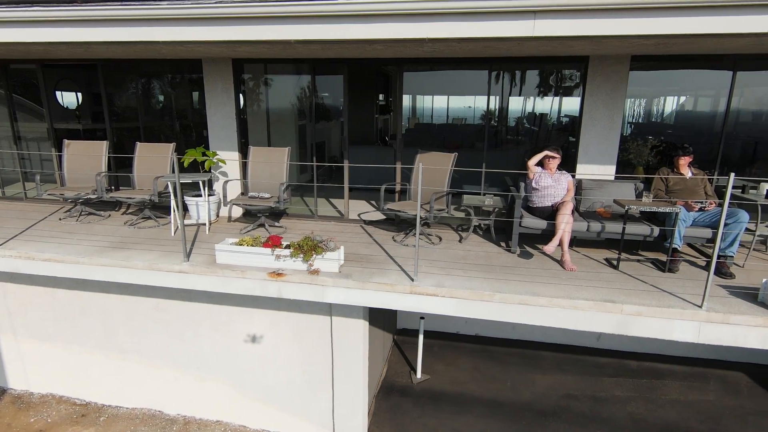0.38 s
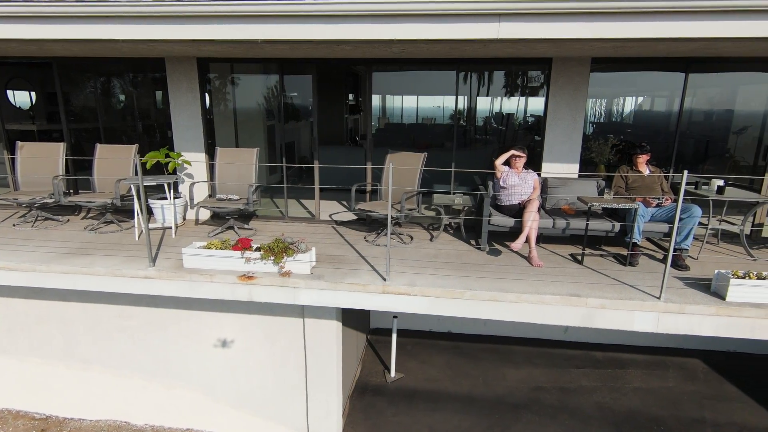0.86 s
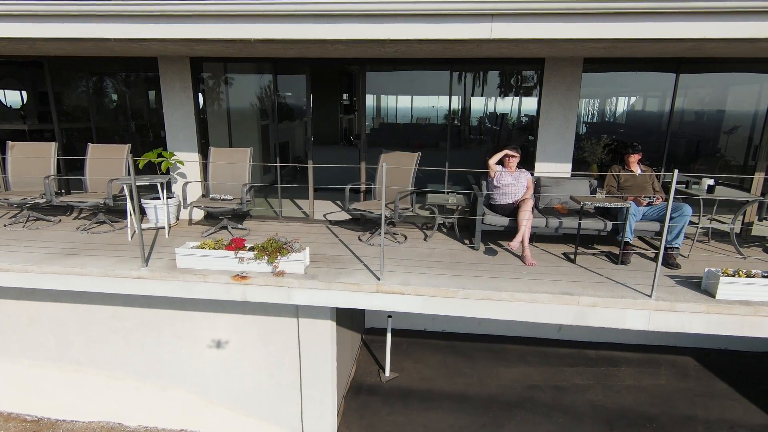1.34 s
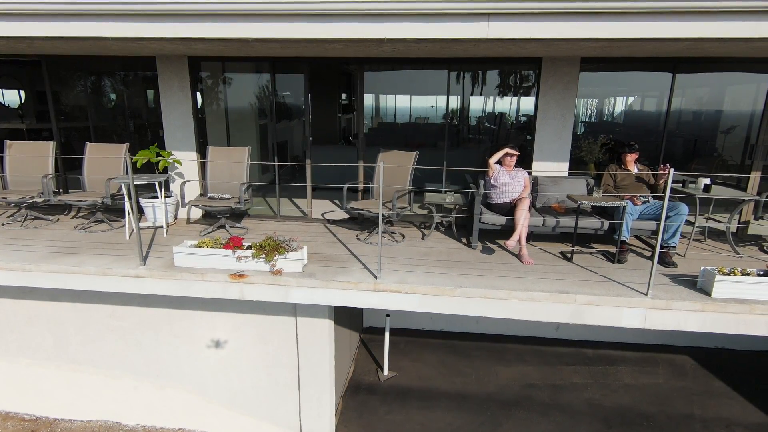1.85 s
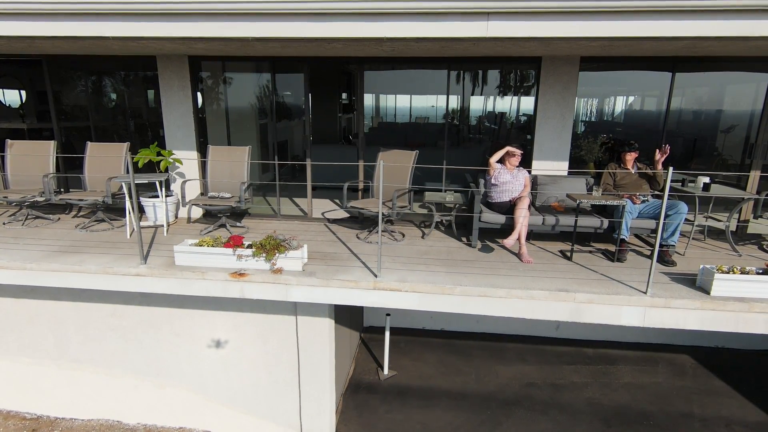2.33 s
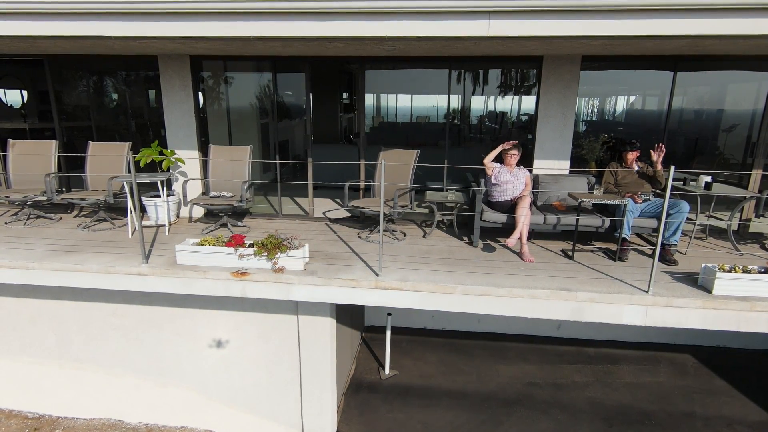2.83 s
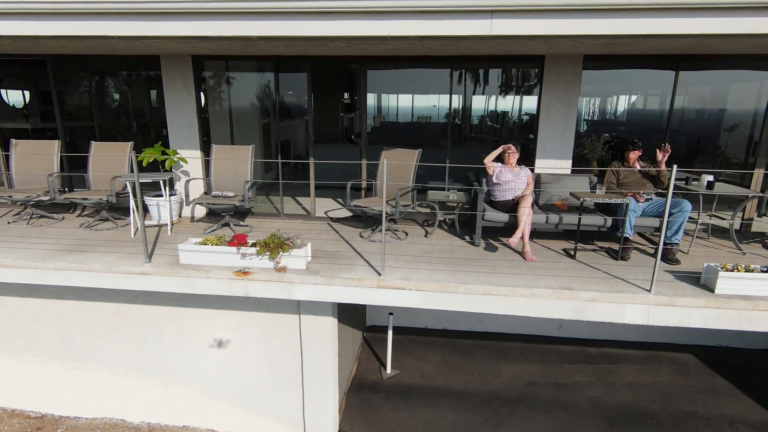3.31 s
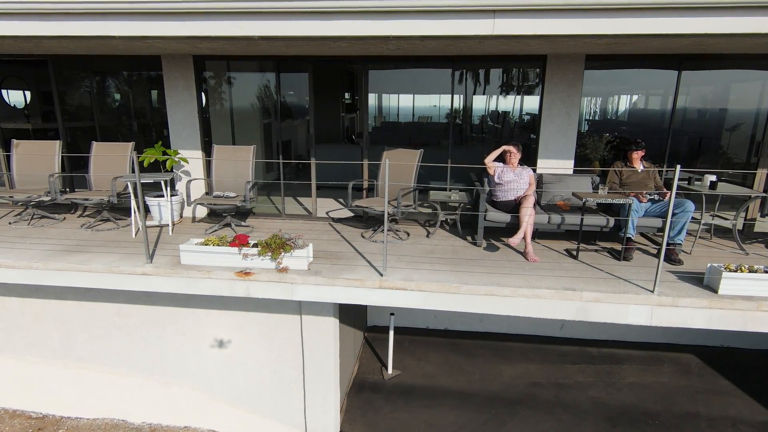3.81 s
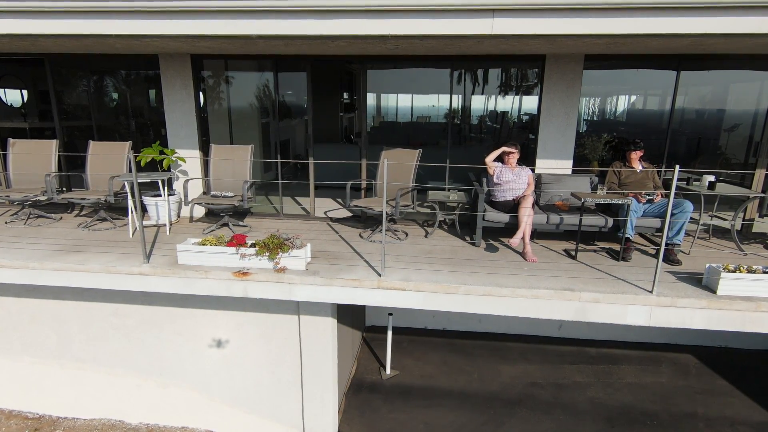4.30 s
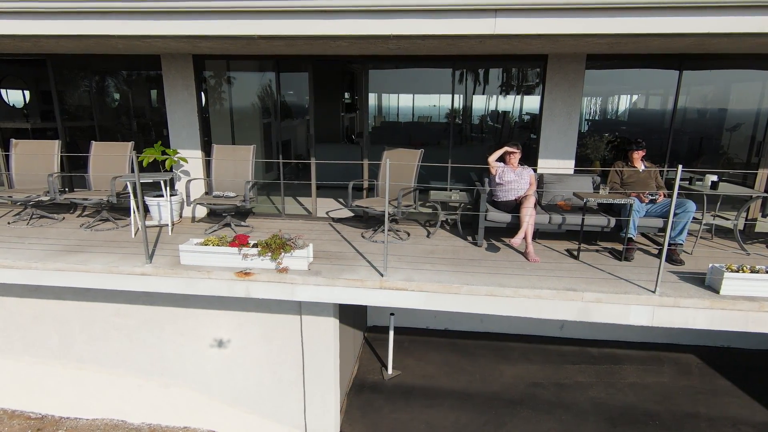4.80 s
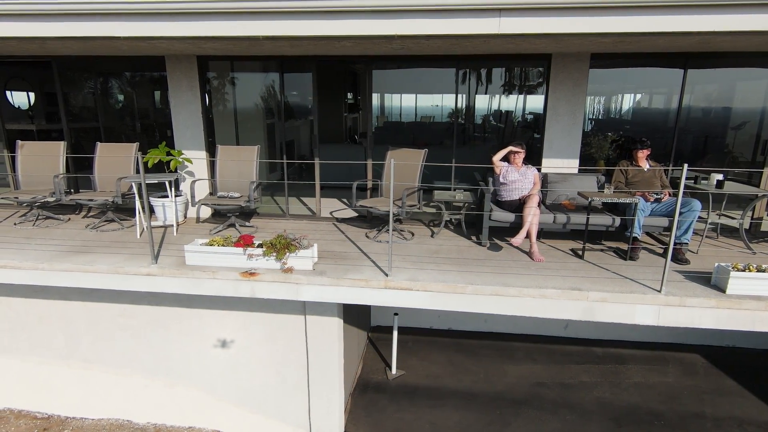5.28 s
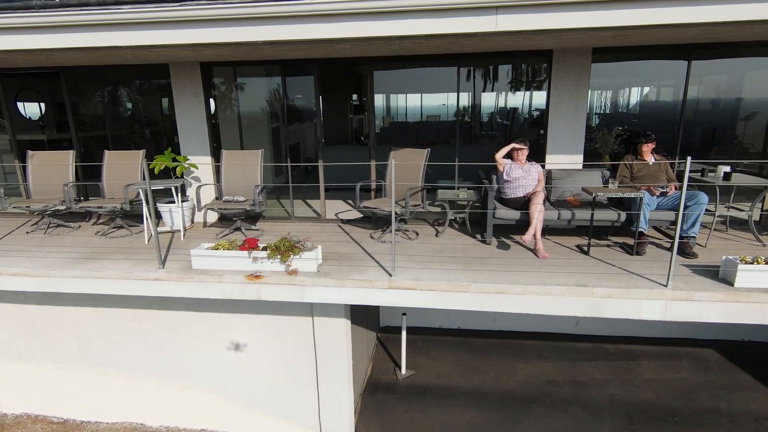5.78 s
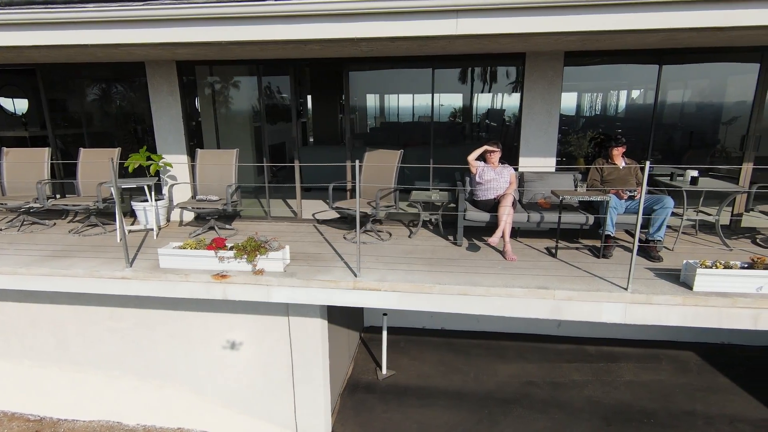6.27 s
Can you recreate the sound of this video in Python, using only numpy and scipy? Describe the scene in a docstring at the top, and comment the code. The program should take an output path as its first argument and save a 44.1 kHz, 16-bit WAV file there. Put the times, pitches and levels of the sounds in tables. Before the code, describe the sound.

A small drone hovers outdoors, heard very close from its own frame. Four rotors give a dense, buzzing whine of stacked tones that drift and beat against each other. Muffled air wash hisses beneath, with little bright treble. The sound runs without pause; past five seconds one motor stumbles for an instant with a faint tick, then carries on.

```python
"""A small four-rotor drone hovers, heard by a two-port microphone on its frame.
From the start, propeller wash hisses beneath, its treble dulled by the housing. Each three-blade rotor sings sines
on its shaft orders (blade passes at 3, 6, 9, magnet poles at 14 and 42); the flight controller keeps trimming the
four speeds, so the stacks drift and beat. At 5.33 s the fourth motor loses step for a moment: its magnet-pole
orders rock in phase and short rings tick."""
import sys
import numpy as np
from scipy import signal
from scipy.fft import rfft, irfft, next_fast_len
from scipy.io import wavfile

SR = 44100
rng = np.random.default_rng(int(sys.argv[2]) if len(sys.argv) > 2 else 0)


def makeup_ratio(level_db):
    """Linear amplitude ratio for a level in decibels (20 dB per factor of ten)."""
    decades = np.asarray(level_db, float) / 20
    return 10 ** decades


def persist_wave(psi):
    """Save psi, clipped to +-1, as 16-bit WAV."""
    counts = np.round(np.clip(psi, -1, 1) * 32767).astype(np.int16)
    wavfile.write(sys.argv[1], SR, np.atleast_2d(counts).T)


N = 292824


def along(table, col, hz):
    """A table column against frequency, on a log axis."""
    rows = np.array(table)
    return np.interp(np.log(hz + 1), np.log(rows[:, 0] + 1), rows[:, col])


def curve(rows):
    """The second column of a table against time, one value per sample."""
    time_s, value = np.transpose(rows)
    return np.interp(np.arange(N) / SR, time_s, value)


def wobble(knots_per_s):
    """A random curve: straight lines between normal knots."""
    knots = rng.standard_normal(int(N * knots_per_s / SR) + 2)
    return np.interp(np.arange(N) * knots_per_s / SR, np.arange(len(knots)), knots)


# propeller wash as the housing passes it: freq_hz, density_db_per_hz
WASH_SPECTRUM = [(12, -110), (25, -83.5), (90, -81), (200, -83.5), (450, -85), (900, -84), (1250, -78),
                 (1600, -78), (1720, -82), (2300, -72), (2550, -84), (3100, -89.5), (3650, -100),
                 (3850, -110), (4200, -124), (4400, -138), (9000, -146)]
# faint hiss bands leaking through the housing: centre_hz, width_hz, density_db_per_hz
HOUSING_LEAKS = [(5610, 300, -127), (6960, 370, -130), (8200, 500, -134)]
# the wash at the two ports: freq_hz, likeness_0_to_1, left_lead_rad, left_minus_right_db
WASH_AT_PORTS = [(40, 0.88, 0, -1), (100, .8, 0, -1.6), (300, .6, 0, -1), (905, 1, -1, -1.5),
                 (1330, 0.2, 0.7, -2), (2000, 0, 0, 0), (2330, 0.06, 0, -0.5), (2600, 0.4, -2.5, -3),
                 (3400, 0.5, -2.5, 0), (4000, 0.03, -2.5, 0), (7000, .4, -.5, -5.5)]


def wash():
    """Turbulent air off the blades: part reaches both ports alike, part is each port's own."""
    size = next_fast_len(N + 8192)
    hz = np.fft.rfftfreq(size, 1 / SR)
    density = makeup_ratio(along(WASH_SPECTRUM, 1, hz))
    for centre_hz, width_hz, density_db in HOUSING_LEAKS:
        density = density + makeup_ratio(density_db) * np.exp(-((hz - centre_hz) / width_hz) ** 2)
    a, b = rfft(rng.standard_normal((2, size))) * density * np.sqrt(SR / 2)

    # mixing two independent noises at +-turn gives a correlation of cos(2 turn)
    turn = np.arccos(np.clip(along(WASH_AT_PORTS, 1, hz), 0, 1)) / 2
    lead_rad, balance_db = along(WASH_AT_PORTS, 2, hz), along(WASH_AT_PORTS, 3, hz)
    tilt = makeup_ratio(balance_db / 2) * np.exp(.5j * lead_rad)
    left = (np.cos(turn) * a + np.sin(turn) * b) * tilt
    right = (np.cos(turn) * a - np.sin(turn) * b) / tilt
    hiss = irfft(np.array([left, right]), size)[:, :N]
    return hiss * makeup_ratio(.6 * wobble(3))


# short rings: start_s, pitch_hz, peak_db (mean of the two ports)
TICK_RINGS = [(5.334, 6800, -76), (5.335, 7900, -77), (5.335, 3520, -62.5), (5.344, 7100, -76)]


def ticks():
    """Short rings as the stumble begins, each swelling to its peak and dying away."""
    rise_s = .0015
    out, t = np.zeros((2, N)), np.arange(SR // 50) / SR
    for start_s, pitch_hz, peak_db in TICK_RINGS:
        envelope = (t / rise_s) * np.exp(1 - t / rise_s)
        ring = np.sin(2 * np.pi * pitch_hz * t) * envelope
        start = round(start_s * SR)
        out[:, start:][:, :len(t)] += makeup_ratio(peak_db) * ring * makeup_ratio([[-2], [2]])  # left, right dB
    return out


POLES = 14
HUNT_HZ = .55  # random hunting of every shaft speed, at the knots


def rotor(speed_hz, orders, flutter_db, scatter_rad, rock_rad=0):
    """Sines on whole multiples of the shaft angle; speed hunts, turbulence shakes each order's size and timing."""
    angle = 2 * np.pi * np.cumsum(speed_hz + HUNT_HZ * wobble(25)) / SR
    faster_hz = speed_hz - speed_hz.mean()
    out = np.zeros((2, N))
    for order, left_db, right_db, left_lead_rad, *climb_db_per_hz in orders:
        multiple = np.round(order)
        # the less an order stands out of the wash, the more turbulence rules it
        wash_db = along(WASH_SPECTRUM, 1, multiple * speed_hz.mean())
        weak = np.clip((34 + wash_db - max(left_db, right_db)) / 20, .05, 1)
        phase = multiple * angle + rng.uniform(0, 2 * np.pi) + scatter_rad * weak * wobble(60)
        # the magnet-pole orders follow the drive's timing
        if multiple % POLES == 0:
            phase = phase + multiple * rock_rad
        for port, level_db in enumerate((left_db, right_db)):
            size = makeup_ratio(level_db + climb_db_per_hz[port] * faster_hz + flutter_db * weak * wobble(14))
            port_phase = phase + left_lead_rad * (1 - port) + scatter_rad * weak * wobble(9)
            out[port] += np.sqrt(2) * size * np.sin(port_phase)
    return out


def stumble():
    """The fourth motor's drive loses step for a moment and rocks about the shaft: angle in rad."""
    start_s, rise_s, hold_s, fall_s = 5.33, .008, .034, .016
    depth_rad, rock_hz = .13, 95
    t = np.arange(N) / SR
    corners_s = np.cumsum([start_s, rise_s, hold_s, fall_s])
    return depth_rad * np.interp(t, corners_s, [0, 1, 1, 0]) * np.sin(2 * np.pi * rock_hz * t)


# shaft orders of each rotor: order (rounded when played), left_db, right_db (rms), left_lead_rad,
# left_climb_db_per_hz, right_climb_db_per_hz (gain per extra turn per s, as the order slides
# along a frame resonance)
ORDERS_1 = [(1, -65.5, -66, -0.2, 0.51, 0.2), (3, -51, -50.5, 0.83, -0.025, 0.31),
            (5, -65.5, -62, -1.5, 2, 1.2), (6, -53, -50, 1.14, 1.6, -0.2),
            (7, -67.5, -65.5, 0.2, 0.6, -0.3), (8, -66, -64.5, -0.2, -0.2, -0.2),
            (9.1, -54.5, -55.5, 1.08, 0.33, 0.49), (10, -64, -63, 1.7, 0.4, 0.8),
            (11, -52.5, -62.5, 1, -0.45, 0.8), (12.1, -59, -60.5, 2.0, -0.4, -0.4),
            (13, -63.5, -55, -2, -0.5, -0.0), (14, -58.5, -56, -2.5, -0.43, -0.43),
            (15, -69, -72, -2, -0.066, 0.0), (16, -80.5, -80, 3, 0, 0), (18, -88, -87, -1, 0, 0),
            (42, -112, -108, 1.5, 0, 0)]
ORDERS_2 = [(3, -43, -46.5, 0.07, 0.071, 0.2), (4, -73.5, -70.5, 0.5, 0.6, 0.4),
            (5, -62, -62, 0, 0.46, 0.91), (6.02, -51.5, -48, 1.5, 0.44, 1),
            (7, -64.5, -66.5, -0.6, -0.59, -0.29), (8, -69.5, -66, -1, 0.1, -0.8),
            (9.03, -59, -59.5, -1.94, 0.031, -0.54), (10, -54.5, -61.5, 2, -0.28, 0.44),
            (11.1, -59.5, -62, 0, 0.41, -0.15), (12, -57, -58, -2.3, 0.6, 0.0),
            (13, -57.5, -56, 0.6, 0.6, 0.36), (14.2, -49, -49.5, -1.84, -0.62, 0.3),
            (15, -67, -66.5, -1.0, -0.3, -0.8), (16, -76.5, -71, -3, -0.8, -1.2),
            (17, -80.5, -77.5, -2.5, 0, 0), (18, -78.5, -79, 2.5, 0, 0), (21, -90.5, -90.5, 2.5, 0, 0)]
ORDERS_3 = [(1, -72.5, -69.5, 0.2, -0.2, -0.2), (3, -49.5, -46.5, -0.08, 0.2, -0.074),
            (6, -42.5, -41, -0.52, 0.6, 0.67), (7, -63, -59.5, 0.9, -0.1, -0.39),
            (9, -57.5, -53.5, 0.5, 0.32, -0.0), (11, -68.5, -62, -2, -0.051, -0.4),
            (12.1, -59, -54.5, 1.6, 0.2, -0.27), (13, -57.5, -62.5, 1.1, 0.59, 0.3),
            (14.1, -52, -60.5, 2, -0.78, 0.1), (15, -60.5, -57, -2.5, -0.21, 0.49),
            (16, -71, -70.5, -3, 0.1, 0.13), (17.9, -71.5, -67.5, 4, 0.38, -0.25),
            (21, -86, -88, 0.5, 0, 0), (42, -110, -106, -0.5, 0, 0)]
ORDERS_4 = [(3, -55.5, -46, -0.95, 0.51, -0.036), (6, -56.5, -55, -1, 0.2, -.5),
            (8, -74, -65.5, 0.5, -.2, -.5), (9, -64, -64, 0.1, 0.25, 0.24), (11, -63, -58, -2, -0.7, 0.27),
            (12, -61, -58, 1, 0.17, 0.91), (13, -53, -53, 0.1, 1.0, 2.1),
            (14, -46.5, -42, -0.3, -0.12, -0.12), (15, -66, -64.5, -2, -.7, -0.48),
            (17, -74, -72.5, -3.5, -.9, -1.0), (18, -77, -74, 1.5, 0, 0),
            (22, -90.5, -90, 1.5, -0.082, -0.047), (42, -99, -86, 1, -.5, -0.99), (48, -112, -104, 2, 0, 0),
            (51, -114, -108, 0.5, 0, 0)]
# shaft speed as the flight controller trims it, before hunting: time_s, speed_hz (turns per s)
SHAFT_SPEED_1 = [(0, 201.4), (.18, 200.3), (.6, 204.6), (.75, 201.9), (1.07, 200.2), (1.4, 201.4),
                 (2.16, 199.6), (2.38, 202.8), (2.5, 199.4), (2.88, 199), (3.03, 196), (3.1, 200.8),
                 (3.3, 200), (3.48, 203.4), (3.59, 196.6), (3.67, 203.6), (3.85, 200.9), (4.3, 199.4),
                 (4.39, 201.6), (4.45, 197), (4.55, 208), (4.64, 199), (4.98, 204.6), (5.12, 200.2),
                 (5.4, 205), (5.48, 200.6), (5.55, 203.8), (5.68, 202.2), (5.76, 204.8), (5.86, 204.6),
                 (5.92, 208), (6.02, 205.4), (6.42, 204.8), (6.5, 199.6), (6.64, 201)]
SHAFT_SPEED_2 = [(0, 180.4), (.1, 178), (.18, 180.9), (.35, 177), (.6, 174.8), (.75, 175.4), (.89, 178.5),
                 (1.07, 179.2), (1.2, 178.1), (1.55, 178.5), (1.92, 176.3), (2.16, 178.3), (2.42, 176),
                 (2.75, 178), (2.95, 178.5), (3.04, 180.6), (3.17, 174), (3.28, 177.8), (3.55, 176.3),
                 (3.95, 178.4), (4.13, 177.8), (4.27, 179.4), (4.39, 175.6), (4.5, 183), (4.56, 178),
                 (4.8, 175.2), (5.01, 175.9), (5.1, 182.2), (5.29, 175.6), (5.39, 181.4), (5.47, 174.8),
                 (5.68, 177.8), (5.79, 181.6), (5.92, 175.2), (6.1, 178.2), (6.34, 176.4), (6.42, 179.8),
                 (6.53, 180), (6.64, 177)]
SHAFT_SPEED_3 = [(0, 176.6), (.1, 178.4), (.19, 175.3), (.4, 172.5), (.76, 173.2), (.9, 175), (1.6, 174.7),
                 (1.81, 173.1), (2.0, 174.6), (2.45, 175.5), (2.63, 175.6), (2.75, 173.8), (2.95, 173.8),
                 (3.1, 169), (3.23, 173.6), (3.42, 170.6), (3.6, 169.8), (3.73, 178.4), (4.0, 178),
                 (4.13, 176.8), (4.28, 179), (4.45, 178.6), (4.5, 173.6), (4.56, 178.2), (4.67, 169.8),
                 (4.78, 173.8), (4.9, 173), (5.12, 176.9), (5.3, 171.9), (5.36, 174), (5.55, 172.4),
                 (5.7, 175), (5.82, 173.8), (5.91, 170.4), (6.0, 172.3), (6.2, 170.4), (6.43, 174.2),
                 (6.55, 164.6), (6.64, 163.8)]
SHAFT_SPEED_4 = [(0, 164.6), (.1, 164), (.34, 166.2), (.55, 168.8), (1.07, 167.9), (1.18, 170.4),
                 (1.32, 172), (1.6, 171.5), (1.81, 173.5), (1.97, 170.6), (2.27, 171.4), (2.68, 165.5),
                 (2.96, 165.9), (3.04, 169.2), (3.1, 166.8), (3.41, 166.4), (3.5, 163.6), (3.66, 163.2),
                 (3.74, 165), (3.91, 163.9), (3.99, 165.5), (4.2, 164.6), (4.33, 166.6), (4.39, 165),
                 (4.49, 167.3), (4.57, 164.2), (4.85, 165.8), (5.02, 168.8), (5.1, 167), (5.17, 169.4),
                 (5.27, 167.9), (5.57, 168.9), (5.68, 173), (5.76, 170.3), (5.84, 174), (5.92, 170),
                 (6.02, 172.6), (6.09, 170.4), (6.5, 168.9), (6.57, 167.2), (6.64, 168.4)]


def rotors():
    """Four stacks of orders, each on its own shaft speed, drift and beat; the fourth stumbles once."""
    one = rotor(curve(SHAFT_SPEED_1), ORDERS_1, flutter_db=3, scatter_rad=.5)
    two = rotor(curve(SHAFT_SPEED_2), ORDERS_2, flutter_db=3, scatter_rad=.33)
    three = rotor(curve(SHAFT_SPEED_3), ORDERS_3, flutter_db=3.5, scatter_rad=.74)
    four = rotor(curve(SHAFT_SPEED_4), ORDERS_4, flutter_db=1.5, scatter_rad=.69, rock_rad=stumble())
    return one + two + three + four


def scene():
    """Wash, ticks and rotor tones at the two ports."""
    return wash() + ticks() + rotors()


def low_pass(x):
    """Removes everything above the highest recorded frequency."""
    return signal.sosfilt(signal.butter(12, 8650, fs=SR, output="sos"), x)


def record(dry):
    """The finished mix as stored."""
    return low_pass(dry)


dry = scene()
out = record(dry)
persist_wave(out)
```